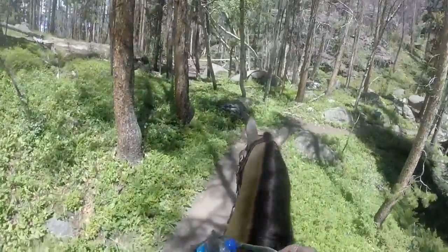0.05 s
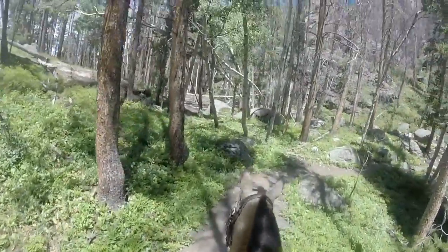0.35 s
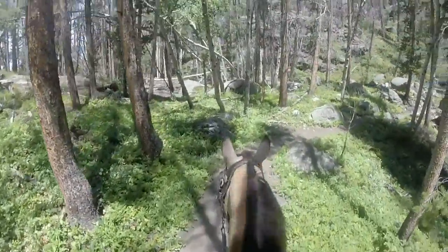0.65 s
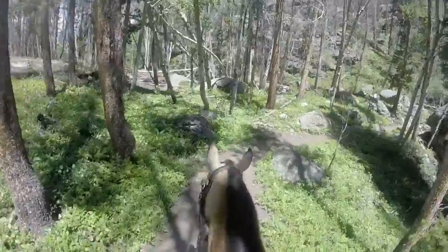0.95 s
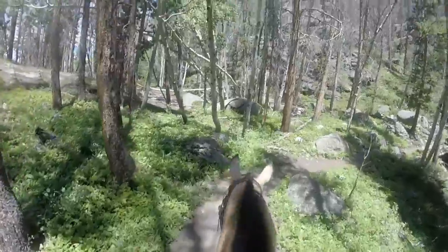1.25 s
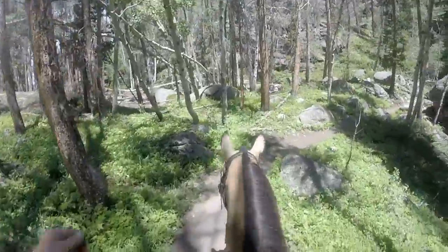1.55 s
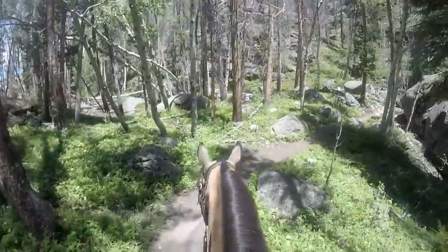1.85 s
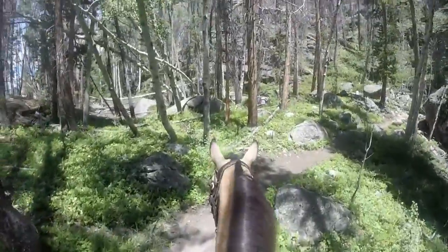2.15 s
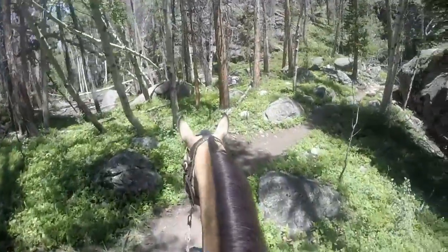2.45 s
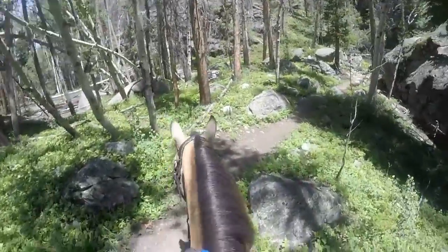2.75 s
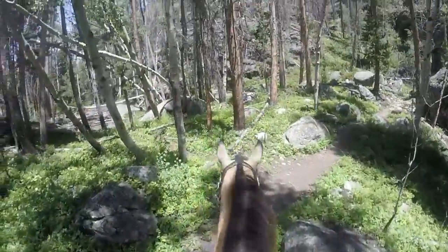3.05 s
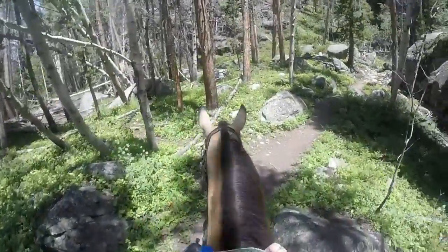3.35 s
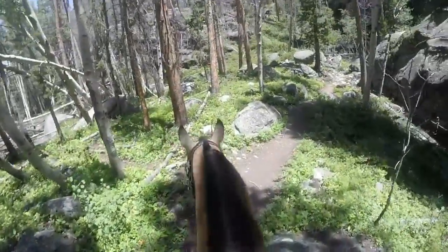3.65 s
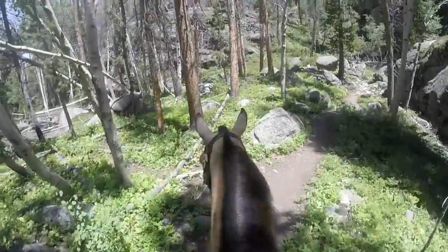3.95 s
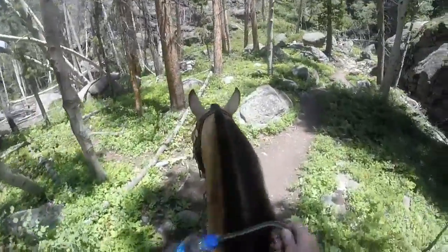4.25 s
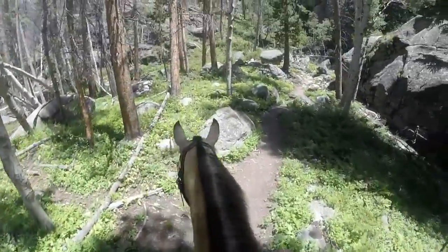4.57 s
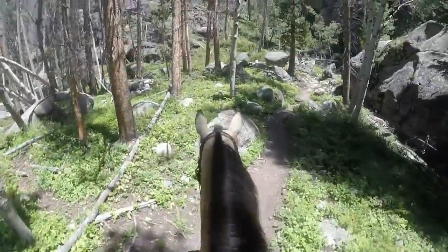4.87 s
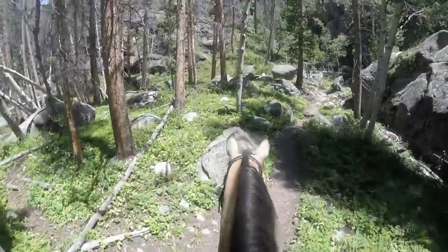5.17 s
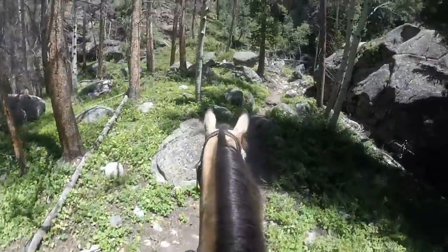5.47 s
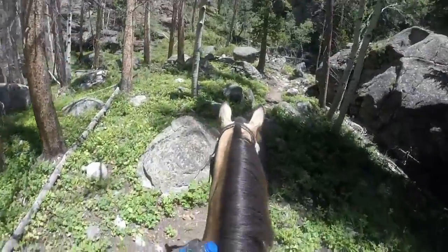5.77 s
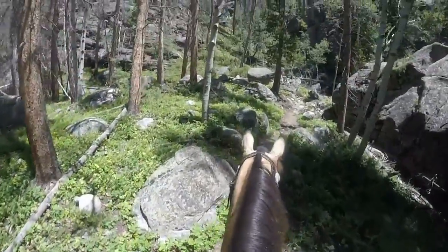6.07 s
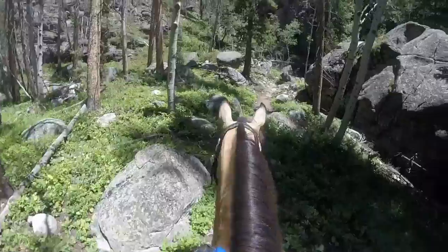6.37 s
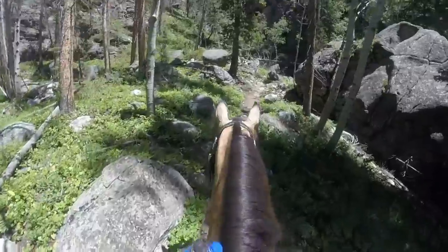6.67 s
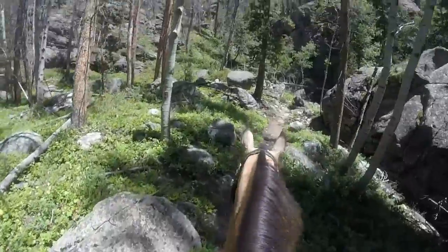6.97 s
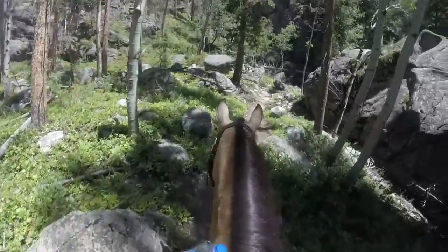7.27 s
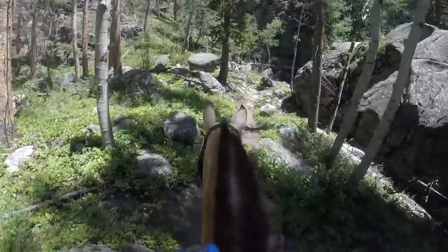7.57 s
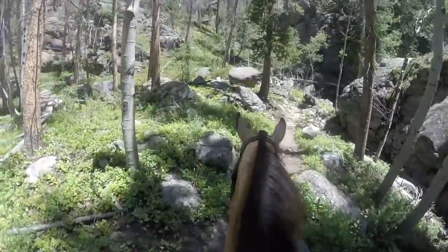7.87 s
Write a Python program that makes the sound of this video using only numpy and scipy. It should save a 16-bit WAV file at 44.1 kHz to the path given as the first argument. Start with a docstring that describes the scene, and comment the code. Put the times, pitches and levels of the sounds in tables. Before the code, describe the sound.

A horse walks a forest trail, hooves thudding unevenly on dirt with gritty scuffs, pebble clicks and occasional hard clops on rock.

```python
"""Horse on a forest trail

A horse walks up dirt and stone, heard from a camera in a plastic case on the rider. Impacts excite
damped modes: dull thuds on dirt, a few hard clops of hollow horn on bare rock. Sliding friction
scuffs the grit and rasps on stone, and flicked pebbles click. The case resonates with these clicks
near 2.2 kHz and rumbles as the rider sways; the forest air hisses faintly."""
import sys
import numpy as np
from scipy import signal
from scipy.fft import rfft, irfft
from scipy.io import wavfile
from scipy.ndimage import uniform_filter1d

SR = 44100
rng = np.random.default_rng(int(sys.argv[2]) if len(sys.argv) > 2 else 0)


def waveform_to_disk(signal):
    """Save audio, clipped to [-1, 1], as 16-bit WAV at the path in sys.argv[1]."""
    frames = np.transpose(np.atleast_2d(signal))
    scaled = np.clip(frames, -1, 1) * 32767
    samples = np.round(scaled).astype(np.int16)
    wavfile.write(sys.argv[1], SR, samples)


N = 358091


def undb(db):
    """Amplitude ratio of a level in decibels."""
    return 10 ** (np.asarray(db) / 20)


def unit(x):
    """Normalisation to an rms of 1."""
    return x / np.sqrt(np.mean(x ** 2))


def add(out, start_s, sound):
    """Superposition: a sound adds to the mix from start_s on."""
    i = max(int(start_s * SR), 0)
    out[i:i + len(sound)] += sound[:max(N - i, 0)]


def colour(x, spectrum, size=8192):
    """Minimum-phase filtering by a spectrum of (frequency_hz, gain_db) points."""
    hz, db = np.transpose(spectrum)
    bins_hz = np.maximum(np.fft.rfftfreq(size, 1 / SR), 1)
    magnitude = undb(np.interp(np.log(bins_hz), np.log(hz), db))
    cepstrum = irfft(np.log(magnitude))
    cepstrum[1:size // 2] *= 2  # folding the cepstrum makes the response causal
    cepstrum[size // 2 + 1:] = 0
    return signal.fftconvolve(x, irfft(np.exp(rfft(cepstrum))))[:len(x)]


def wander(rate_hz):
    """Random modulation: smoothed random steps with an rms of 1."""
    hold = int(SR / rate_hz)
    steps = np.repeat(rng.standard_normal(N // hold + 1), hold)
    return unit(uniform_filter1d(uniform_filter1d(steps, hold), hold)[:N])


def grains(per_s, spread_db):
    """Shot noise: independent impulses, most small and a few large."""
    size = undb(spread_db * np.minimum(rng.exponential(size=N), 4))
    return (rng.random(N) < per_s / SR) * size * rng.standard_normal(N)


def envelope(pulses):
    """Incoherent addition: Gaussian pulses (middle_s, length_s, level_db) sum in power."""
    power = np.zeros(N)
    for middle_s, length_s, db in pulses:
        start_s = middle_s - 2 * length_s
        t = np.arange(max(start_s, 0), middle_s + 2 * length_s, 1 / SR)
        add(power, start_s, undb(db) ** 2 * np.exp(-(2 * (t - middle_s) / length_s) ** 2))
    return np.sqrt(power)


# Resonances of the plastic case: centre_hz, bandwidth_hz, boost_db
CASE_MODES = [(1074, 87, 2.5), (1380, 23, 6), (2130, 90, 13.5), (2240, 146, 11.5), (2600, 70, 11),
              (2947, 45, 13), (4060, 200, 14), (4600, 61, 6.5), (5510, 110, 7.5), (6300, 450, 8),
              (7570, 130, 13)]
def case_ring(x, share=1):
    """Resonance: the case amplifies narrow bands and lets them ring on."""
    for hz, bandwidth_hz, boost_db in CASE_MODES:
        resonator = signal.iirpeak(hz, hz / bandwidth_hz, fs=SR)
        x = x + (undb(boost_db * share) - 1) * signal.lfilter(*resonator, x)
    return x


# Spectrum of the forest air: frequency_hz, gain_db
AIR_SPECTRUM = [(20, 0.5), (70, 2.5), (125, 1), (200, -3), (300, -4.5), (520, -11), (1100, -15),
                (1700, -17.5), (2200, -18.5), (3200, -21), (4300, -25), (6500, -30.5), (10000, -36.5),
                (15000, -48)]
def forest_air(level_db=-52.5):
    """Broadband noise: a smooth distant hiss whose level drifts slightly."""
    hiss = case_ring(colour(rng.standard_normal(N), AIR_SPECTRUM), share=0.1)
    return undb(level_db + 0.5 * wander(3.08)) * unit(hiss)


# Spectrum of colliding sand grains: frequency_hz, gain_db
GRIT_SPECTRUM = [(250, -34), (600, 4.5), (1100, 6), (1700, 0), (2400, -5.5), (3300, -10.5), (4500, -13),
                 (7000, -24.5), (9500, -33), (15000, -43)]
def sand_trickle(level_db=-69):
    """Granular noise: loose sand keeps settling in tiny collisions."""
    trickle = case_ring(colour(grains(per_s=330, spread_db=3), GRIT_SPECTRUM), share=0.75)
    return undb(level_db + 0.84 * wander(5.25)) * unit(trickle)


USUAL_WEIGHT_DB, USUAL_GRIT_DB = -27, -54  # reference levels of an ordinary step
# Spectrum of the shaken camera: frequency_hz, gain_db
RUMBLE_SPECTRUM = [(6, -38), (14, 14), (24, -9.5), (40, -17), (65, -17.5), (110, -18), (300, -69)]
# Strength of the rider's sway: time_s, level_db
SWAY_LEVELS = [(0, -39), (0.25, -48.5), (0.9, -40.5), (1.2, -49), (1.6, -42.5), (2.4, -49.5), (2.9, -41.5),
               (3.5, -51.5), (3.9, -46), (4.9, -50.5), (6.1, -52), (8.12, -51)]
def rider_sway(gain_db=-2, lurch_db=2.5, lag_s=0.046, lurch_s=0.099):
    """Structure-borne sound: rocking shakes the camera, and each hoof slip adds a jolt just after."""
    lurch = envelope([(middle_s + lag_s, lurch_s, grit_db - USUAL_GRIT_DB + lurch_db)
                      for middle_s, _, grit_db, _ in slips()])
    rocking = undb(np.interp(np.arange(N) / SR, *np.transpose(SWAY_LEVELS)) + gain_db)
    rumble = unit(colour(rng.standard_normal(N), RUMBLE_SPECTRUM))
    return rocking * np.hypot(1, lurch) * rumble


# Spectrum of a hoof rim on sandy stone: frequency_hz, gain_db
RASP_SPECTRUM = [(800, -37), (2200, -1), (3300, -7), (3850, -2), (4100, -0.5), (4450, -23), (5200, -18),
                 (8000, -42), (15000, -54)]
# Rims grazing stone as the hooves reach forward: middle_s, level_db
RIM_RASPS = [(0.1, -55), (0.48, -58), (1.455, -48), (2.39, -55), (2.82, -52), (3.295, -57), (3.755, -55),
             (4.24, -57), (4.279, -55.5), (4.787, -54.5), (5.28, -56), (5.83, -63), (7.672, -63),
             (7.71, -66), (8.104, -58.5)]
def rim_rasps(length_s=0.026, gain_db=1):
    """Stick-slip friction: the rim catches finely and densely on stone, with a thin, high ring."""
    loudness = envelope([(middle_s, length_s, db + gain_db) for middle_s, db in RIM_RASPS])
    return loudness * unit(colour(grains(per_s=2200, spread_db=1.5), RASP_SPECTRUM))


def tilted(touch_offset_s):
    """Temporal fusion: a landing counts as two touches only if they are over 5 ms apart."""
    return abs(touch_offset_s) > 0.005


# Hooves dragging through grit between landings: middle_s, length_s, grit_db
HOOF_DRAGS = [(0.113, 0.031, -50), (0.597, 0.071, -55.5), (0.753, 0.054, -54.5), (1.453, .034, -46.5),
              (1.697, .057, -52), (1.786, 0.054, -54), (2.106, .035, -49), (2.355, .034, -53),
              (2.678, .15, -59), (4.089, .035, -57.5), (4.283, 0.065, -59), (5.847, 0.025, -48),
              (6.493, 0.0199, -58), (6.756, 0.057, -59.5), (7.487, .05, -62.5), (7.69, .05, -52.5),
              (8.11, 0.028, -58.5)]
def slips(drag_weight_db=-35.5, split_share=0.56, lead_s=0.001):
    """Sliding contact in every drag and landing, as rows of middle_s, length_s, grit_db, weight_db."""
    rows = [(*drag, drag_weight_db) for drag in HOOF_DRAGS]
    for time_s, weight_db, _, _, touch_offset_s, slide_s, grit_db in DIRT_LANDINGS:
        if tilted(touch_offset_s):  # two shorter spurts, one at each touch
            for touch_s in (time_s, time_s + touch_offset_s):
                rows.append((touch_s - lead_s, split_share * slide_s, grit_db, weight_db))
        else:
            rows.append((time_s - lead_s, slide_s, grit_db, weight_db))
    return np.array(rows)


# Spectrum of crunching soil: frequency_hz, gain_db
SOIL_SPECTRUM = [(40, -28), (90, -8.5), (140, 9), (210, 2.5), (310, 1.5), (450, -14), (800, -42),
                 (2000, -50.5)]
def scuffs(sand_gain_db=2, usual_soil_db=-48):
    """Granular friction: sand crackles under a sliding hoof; the soil below crunches more with load."""
    middle_s, length_s, grit_db, weight_db = slips().T
    soil_db = usual_soil_db + 0.73 * (grit_db - USUAL_GRIT_DB) + 0.39 * (weight_db - USUAL_WEIGHT_DB)
    sand = case_ring(colour(grains(per_s=1000, spread_db=2), GRIT_SPECTRUM))
    sand *= undb(1.97 * wander(160))  # the level flickers
    soil = colour(grains(per_s=1500, spread_db=5), SOIL_SPECTRUM)
    sand_envelope = envelope(np.c_[middle_s, length_s, grit_db + sand_gain_db])
    soil_envelope = envelope(np.c_[middle_s, length_s, soil_db])
    return sand_envelope * unit(sand) + soil_envelope * unit(soil)


# Spectrum of colliding pebbles: frequency_hz, gain_db
PEBBLE_SPECTRUM = [(150, -16.5), (350, 20.5), (650, 2.5), (1200, 5.5), (2100, 3), (3200, -2), (4500, -9),
                   (7000, -20.5), (9500, -26), (15000, -48)]
# Pebbles flicked by the hooves: start_s, level_db, brightness_db
PEBBLE_CLICKS = [(0.0595, -35, -18), (0.2055, -33.5, -23), (0.8126, -37, -8), (1.0416, -36, -23),
                 (1.233, -42, 3), (1.4363, -34, -9), (1.642, -32, -26), (1.6997, -40, -5),
                 (1.7696, -32, -12), (1.7923, -30, -13), (1.8993, -36.5, -24), (2.1516, -34, -17),
                 (2.6195, -28.5, -16), (2.8312, -25.5, -11), (3.142, -28, -22), (3.196, -36.5, -19),
                 (3.2265, -33, -17), (3.3163, -27, -14), (3.6256, -34, -32), (3.7874, -32, -25),
                 (4.292, -30.5, -14), (4.6644, -37.5, 0), (4.7729, -43, -15), (4.797, -33, -30),
                 (4.847, -33, -1), (4.8655, -33, -12), (4.8775, -39, -19), (5.1262, -31, -15),
                 (5.2922, -37, -9), (5.3146, -33, -17), (5.3302, -32.5, -19), (5.4953, -38, -28),
                 (5.8478, -31, -28), (5.8564, -32, -41), (6.3004, -37.5, -13), (6.8244, -37.5, -16),
                 (6.8473, -38.5, -26), (7.197, -34.5, -27), (7.739, -37, -1), (7.7601, -35, -13),
                 (7.922, -32, -16)]
def pebbles(crackle=0.2, crackle_s=0.0018, gain_db=-2, neutral_db=-12):
    """Impulse excitation: a pebble's sharp contact and brief crackle set the case ringing."""
    out = np.zeros(N)
    t = np.arange(2048) / SR
    for start_s, level_db, brightness_db in PEBBLE_CLICKS:
        contact = (t == 0) + crackle * rng.standard_normal(len(t)) * np.exp(-t / crackle_s)
        crack = colour(contact, PEBBLE_SPECTRUM)
        treble_db = 0.76 * (brightness_db - neutral_db)
        click = case_ring(colour(crack, [(2400, 0), (3800, treble_db)]))
        add(out, start_s, undb(level_db + gain_db) * click / np.abs(click).max())
    return out


def cushioned_mode(hz, ring_s, sag=0, size=4000):
    """Soft excitation: a mode swells for a tenth of ring_s, then fades; sag lowers its pitch."""
    t = np.arange(size) / SR
    age = 10 * t / ring_s
    pitch_hz = hz * (1 - sag * (1 - np.exp(-age / 2)))
    return np.sin(2 * np.pi * np.cumsum(pitch_hz) / SR) * age * np.exp(1 - age)


def thud(pitch_hz, hardness_db):
    """Contact stiffness: harder ground shortens the thud and makes its upper mode higher and stronger."""
    stretch = 2 ** (-hardness_db / 66)
    upper_hz = 305 * 2 ** (hardness_db / 54) * np.exp(0.1 * rng.standard_normal())
    low = cushioned_mode(pitch_hz, ring_s=0.0261 * stretch, sag=0.12)
    upper = cushioned_mode(upper_hz, ring_s=0.0183 * stretch)
    body = low - undb(hardness_db + 3) * upper
    return body / np.abs(body).max()


# Landings on packed dirt; a tilted hoof also touches before (-) or after (+) it takes the weight:
# time_s, weight_db, pitch_hz, hardness_db, touch_offset_s, slide_s, grit_db
DIRT_LANDINGS = [(0.018, -17, 161, -14, 0, 0.057, -47), (0.205, -27.5, 128, -9, 0.0063, 0.03, -48.5),
                 (0.499, -35, 130, -21, -.026, 0.044, -52), (0.952, -42, 106, -2, 0.0033, .026, -49),
                 (1.06, -15.5, 107, -20.5, -.016, 0.081, -54), (1.194, -20, 149.3, -8.5, 0, 0.054, -55),
                 (1.233, -23, 152, -22, 0, 0.0084, -45), (1.277, -23.5, 137, -9.5, 0.021, 0.08, -54.5),
                 (1.438, -18.5, 133, -15, 0, 0.0089, -49), (1.509, -24.5, 149, -13, -0.017, 0.078, -58),
                 (1.546, -32, 148, -1, 0, .02, -73), (1.639, -34.5, 133, -16, 0, .02, -68),
                 (1.74, -31.5, 151, -9, 0, 0.034, -68), (1.901, -28, 123, -6, 0, .03, -52),
                 (1.956, -26.5, 165, 23, -0.0024, 0.1, -59), (2.153, -30, 148, 1.5, -0.0062, .02, -66),
                 (2.226, -28.5, 134, -9, -0.007, 0.054, -57.5),
                 (2.425, -27.5, 133, -2.5, -.018, 0.056, -49), (2.553, -27, 133, -30, 0, .02, -55),
                 (2.598, -26, 131, -5.5, 0.02, 0.072, -69), (2.826, -20, 163, 4, 0, 0.039, -45),
                 (3.14, -24, 150, -7, -.02, .04, -50.5), (3.306, -29.5, 129.6, -4, 0, 0.053, -51),
                 (3.623, -28.5, 168, -0.5, -.029, .07, -54), (3.784, -24.5, 148.5, 2.5, -.023, 0.038, -47),
                 (4.112, -16, 118.7, -8.5, 0, 0.023, -53.5), (4.288, -29.5, 128.2, 0, .03, .04, -51),
                 (4.455, -28.5, 153, -12.5, 0, .04, -56.5), (4.603, -34, 124, -14, 0.0068, .03, -57.5),
                 (4.774, -31, 153.7, -6, .026, 0.025, -49.5), (4.85, -27, 160, 2, .018, .035, -46.5),
                 (5.097, -25, 176.2, -6, .03, 0.052, -56.5), (5.333, -30, 143.2, 0, -0.028, 0.052, -49),
                 (5.493, -26, 155, -10, 0, .04, -60.5), (5.631, -28.5, 138, -8, 0.021, .03, -56.5),
                 (5.835, -24.5, 150.6, 12.5, 0, 0.022, -54), (5.868, -26, 133.6, -7, 0, .02, -62),
                 (6.091, -30, 153, -8, 0.027, .035, -58), (6.299, -28, 137, 1.5, 0, .04, -49.5),
                 (6.42, -25, 151.7, -9, 0.015, .03, -57), (6.588, -32.5, 123, -24, 0, 0.056, -55),
                 (6.844, -32.5, 140, -0.5, -0.026, .04, -56),
                 (7.011, -29, 130, -18.5, -0.028, 0.037, -57.5), (7.197, -31, 190, 12, 0, 0.052, -50.5),
                 (7.345, -25, 147, -8, 0, 0.019, -61), (7.738, -25, 145, -13, 0.0071, 0.024, -54),
                 (7.923, -17.5, 156, -9.5, -.018, .035, -55)]
def hoof_thuds(lead_s=0.0015, touch_pitch_ratio=0.85):
    """Damped impact: each contact with dirt gives a dull thud; the extra touch is lower in pitch."""
    out = np.zeros(N)
    for time_s, weight_db, pitch_hz, hardness_db, touch_offset_s, _, _ in DIRT_LANDINGS:
        add(out, time_s - lead_s, undb(weight_db) * thud(pitch_hz, hardness_db))
        if tilted(touch_offset_s):
            touch_db = USUAL_WEIGHT_DB - 1.5 + 0.69 * (weight_db - USUAL_WEIGHT_DB)
            touch = thud(pitch_hz * touch_pitch_ratio, hardness_db)
            add(out, time_s + touch_offset_s - lead_s, undb(touch_db) * touch)
    return colour(out, [(20, -36.5), (60, -8), (110, -0.5), (330, -3.5), (480, -18), (2000, -11.5)])


def struck_mode(hz, t60_s, rise_s, size=6000):
    """Free vibration: a sine builds up quickly and decays exponentially."""
    t = np.arange(size) / SR
    build_up = 1 - np.exp(-t / rise_s)
    return np.sin(2 * np.pi * hz * t) * build_up * np.exp(-np.log(1000) * t / t60_s)


# Modes of a hoof on rock: pitch_hz, t60_s, level_db, rise_s
HOOF_MODES = [(130, 0.12, -14, 0.0018), (340, 0.014, 4, 0.00033), (682, 0.024, -5.5, 0.0018),
              (950, 0.0029, -38, 0.00022), (1085, 0.031, -1, 0.00059), (1349, 0.016, -1.5, 0.0011),
              (1740, 0.021, -7.5, 0.0045), (1810, 0.066, -23, 0.00025), (2169, 0.02, 0.5, 0.003),
              (2270, 0.021, -12, 0.0048), (2550, 0.017, -17, 0.002), (3750, 0.017, -15, 0.0095),
              (4730, 0.011, -28, 0.00092), (6100, 0.013, -34, 0.0014)]
# Hooves striking bare rock: start_s, peak_db, brightness_db, hoof_wall_db
ROCK_STRIKES = [(0.2034, -31.5, -5, 4), (1.2963, -23, -5.5, 6), (1.6725, -18.5, 7.5, -3),
                (2.723, -19, 6, -3.5), (3.6676, -20.5, 4.5, 4), (4.7715, -34.5, -18, -11),
                (5.8337, -41, -11, -6), (6.621, -19.5, 6.5, 0.5), (7.7392, -27.5, 18, -1)]
def hoof_clops(detune=0.003, scatter_db=0.3):
    """Modal superposition: the hollow horn rings briefly on rock, a little differently each time."""
    out = np.zeros(N)
    for start_s, peak_db, brightness_db, hoof_wall_db in ROCK_STRIKES:
        ring = 0
        for hz, t60_s, mode_db, rise_s in HOOF_MODES:
            tuning, force = rng.standard_normal(2)
            upper = np.clip(np.log2(hz / 1070), 0, 1)  # a harder blow favours the upper modes
            wall = 1450 < hz < 1980  # the point of contact decides how much these modes speak
            gain = undb(mode_db + scatter_db * force + brightness_db * upper + hoof_wall_db * wall)
            ring = ring + gain * struck_mode(hz * (1 + detune * tuning), t60_s, rise_s)
        add(out, start_s, undb(peak_db) * ring / np.abs(ring).max())
    return out


def scene(width_db=-37, hiss_db=-81):
    """Mid-side stereo: a very faint smeared copy of the sound and a trace of hiss give slight width."""
    hooves = hoof_thuds() + hoof_clops() + pebbles() + scuffs() + rim_rasps()
    mid = hooves + rider_sway() + forest_air() + sand_trickle()
    smear = rng.standard_normal(1024) * np.linspace(1, 0, 1024)
    width = signal.fftconvolve(mid, smear / np.linalg.norm(smear))[:N]
    width = colour(width, [(30, -24), (120, -27), (250, -8), (500, -34),
                           (1000, -2), (2000, 4), (4000, 10), (9000, 12)])
    hiss = colour(rng.standard_normal(N),
                  [(100, 26.5), (400, 12.5), (1000, 7), (4000, 1.5), (8000, -9.5), (15000, -14)])
    side = undb(width_db) * width + undb(hiss_db) * unit(hiss)
    return np.array([mid + side, mid - side])


def record(dry, cutoff_hz=15050):
    """Band limiting: the camera's steep low-pass filter removes the highest treble."""
    return signal.sosfilt(signal.ellip(10, 0.2, 70, cutoff_hz, fs=SR, output="sos"), dry)


dry = scene()
out = record(dry)
waveform_to_disk(out)
```